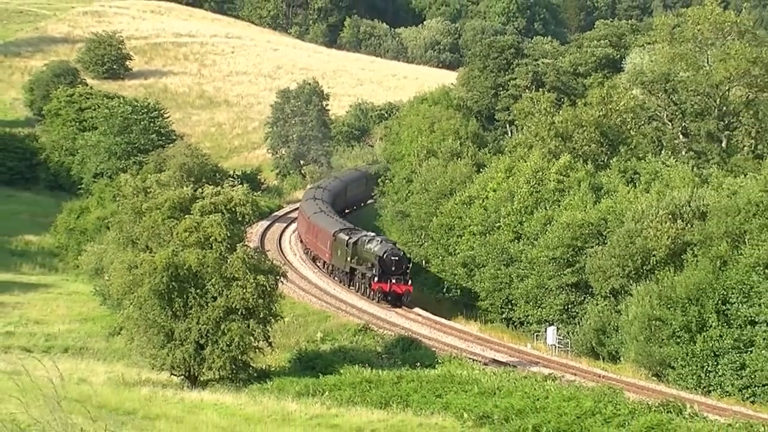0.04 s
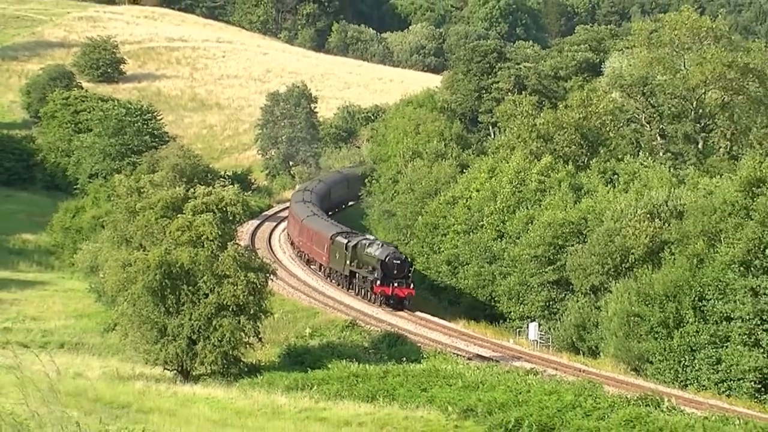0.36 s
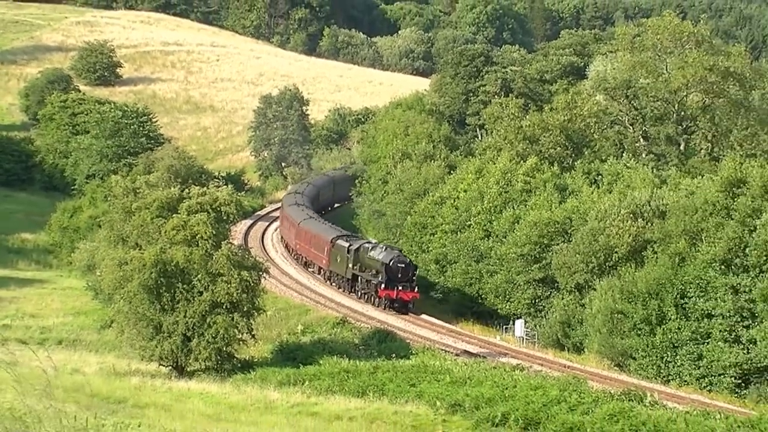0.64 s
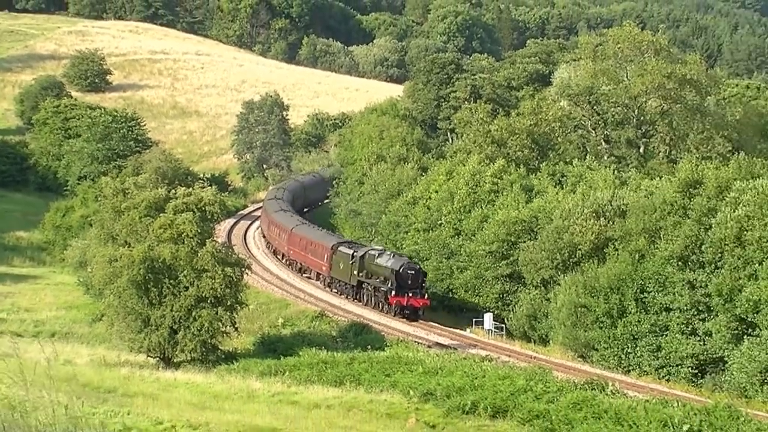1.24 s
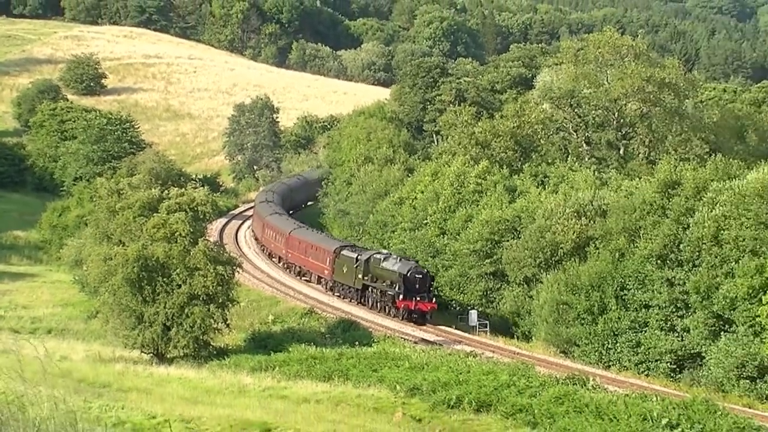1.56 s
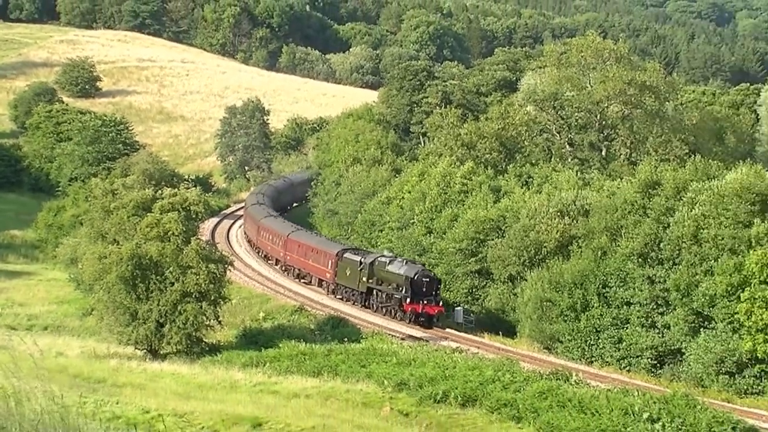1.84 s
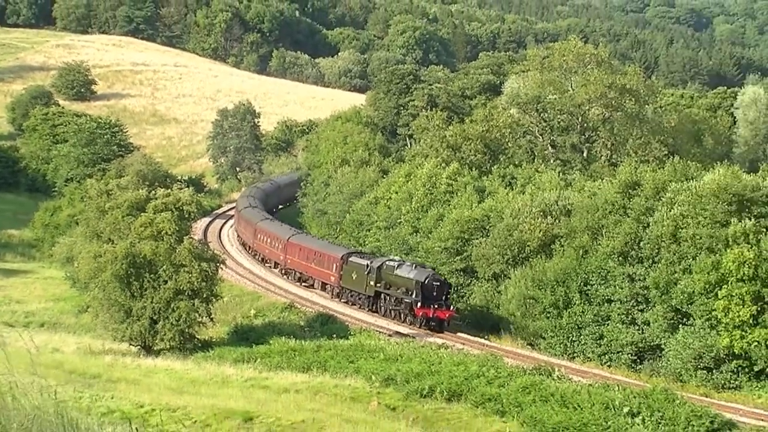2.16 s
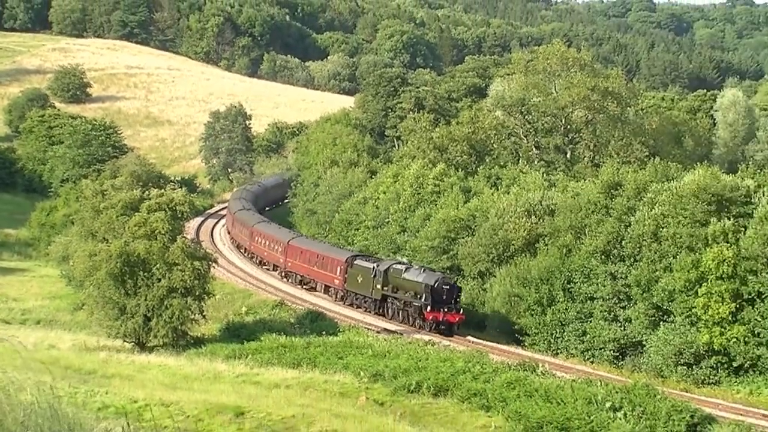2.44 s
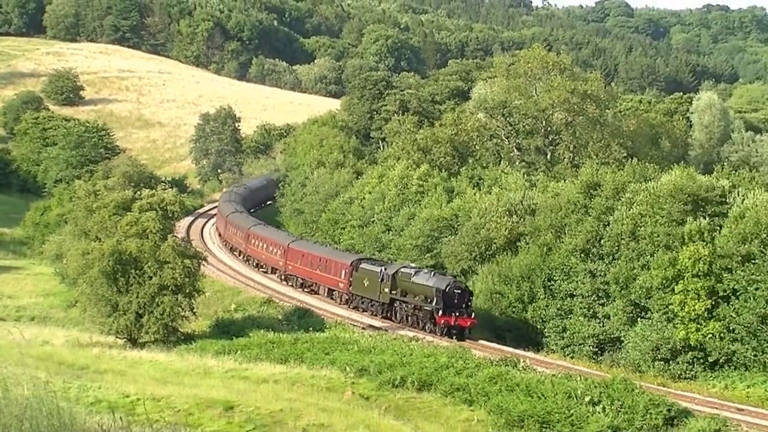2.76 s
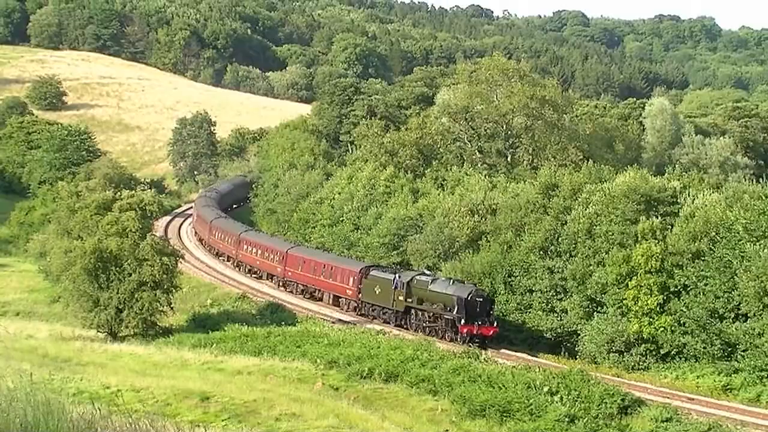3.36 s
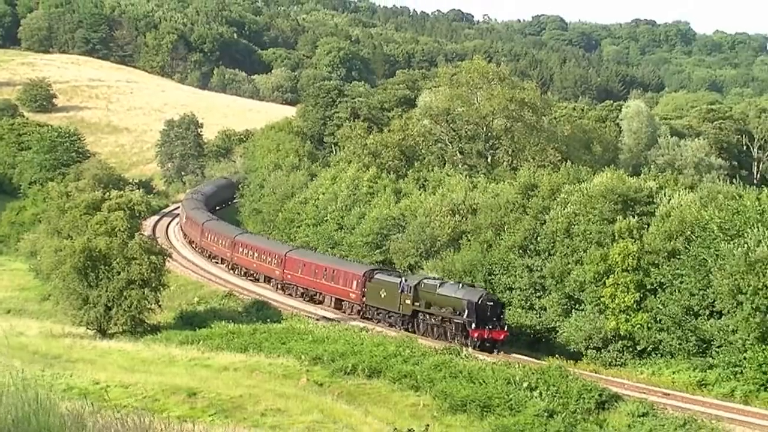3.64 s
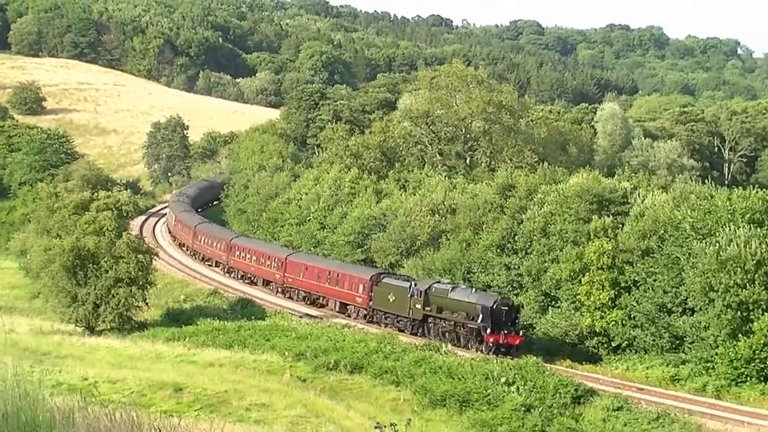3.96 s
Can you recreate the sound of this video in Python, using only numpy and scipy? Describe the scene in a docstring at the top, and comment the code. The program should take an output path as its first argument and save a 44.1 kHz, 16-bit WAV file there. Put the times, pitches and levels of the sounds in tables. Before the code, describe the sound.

Outdoors in a valley, a steam train some way from the microphone gives steady hissing chuffs, each with a faint echo. Beneath them run soft, uneven low puffs and the slowly swelling rumble of wheels on rails.

```python
"""A wooded valley, where a steam locomotive works some way off and slowly comes nearer.
Sharp chuffs come evenly, each a turbulent jet of steam gated by a valve, and the slopes scatter them
back as a diffuse echo. Soft low exhaust beats resonate unevenly in the chimney, about four to each chuff.
Underneath, the rolling noise of the coaches and a deep rumble grow as the distance shrinks."""
import sys
import numpy as np
from scipy import signal
from scipy.fft import rfft, irfft
from scipy.io import wavfile
from scipy.ndimage import uniform_filter1d

SR = 44100
rng = np.random.default_rng(int(sys.argv[2]) if len(sys.argv) > 2 else 0)


def wav_out(sig):
    """Save sig, one row per channel (or a flat mono array), as 16-bit PCM at SR to the path in sys.argv[1]."""
    wavfile.write(sys.argv[1], SR, np.round(np.clip(np.atleast_2d(sig).T, -1, 1) * 32767).astype(np.int16))


N = 176400
FRAME, HOP = 512, 128
HZ = np.fft.rfftfreq(FRAME, 1 / SR)
FRAME_TIMES = np.arange(N // HOP + 5)[:, None] * HOP / SR
APPROACH_DB_PER_S = 1.06


def amp(db):
    """Amplitude ratio of a level in decibels."""
    return 10 ** (np.asarray(db) / 20)


def unit(x):
    """Normalisation to rms 1."""
    return x / np.sqrt(np.mean(x ** 2) + 1e-20)


def read(points, hz):
    """Interpolation of a table on a log-frequency axis."""
    f, value = np.transpose(points)
    return np.interp(np.log(hz + 1), np.log(f + 1), value)


def hump(hz, octaves):
    """Gaussian peak on a log-frequency axis."""
    return np.exp(-.5 * (np.log2((HZ + 1) / hz) / octaves) ** 2)


def add(mix, start_s, sound):
    """Superposition of a sound on the mix."""
    part = mix[max(round(start_s * SR), 0):][:len(sound)]
    part += sound[:len(part)]


def colour(x, points):
    """Spectral filtering by a table of frequency_hz, gain_db."""
    return irfft(rfft(x) * amp(read(points, np.fft.rfftfreq(len(x), 1 / SR))), len(x))


def coloured_noise(spectrum):
    """Filtered white noise of rms 1."""
    return unit(colour(rng.standard_normal(N), spectrum))


def patches(frames, bins):
    """Random field of rms 1, correlated over time and frequency by smoothing."""
    field = rng.standard_normal((len(FRAME_TIMES), len(HZ)))
    for axis in (0, 1, 0, 1):
        field = uniform_filter1d(field, (frames, bins)[axis], axis, mode="wrap")
    return unit(field)


def shaped(x, gain):
    """Time-varying filter: a gain on each cell of the short-time spectrum."""
    spectra = signal.stft(x, nperseg=FRAME, noverlap=FRAME - HOP)[2]
    return signal.istft(spectra * gain[:spectra.shape[1]].T, nperseg=FRAME, noverlap=FRAME - HOP)[1][:N]


def rumble():
    """Spreading loss falls as the train nears, so its deep rumble swells."""
    # rumble spectrum: frequency_hz, density_db
    spectrum = [(15, -32), (40, -9), (62, 0), (85, -3), (130, -18), (400, -50), (2000, -90)]
    final_db, rise_db_per_s = -59, 1.5
    return amp(final_db + rise_db_per_s * (np.arange(N) - N) / SR) * coloured_noise(spectrum)


def wheels():
    """Rolling noise of wheels on rails, brightening as a shorter path lessens air absorption."""
    # rolling spectrum: frequency_hz, density_db
    spectrum = [(20, -44), (40, -38), (62, -18.5), (90, -20.5), (150, -2.5), (300, 1), (460, 2), (750, 0.5),
                (1100, -1.5), (1900, -1.5), (3500, -6), (4500, -16), (7000, -23), (10000, -31.5),
                (14000, -51)]
    growth_db_per_s = APPROACH_DB_PER_S + read([(4000, 0), (10000, 1)], HZ)
    level_db = -32 + growth_db_per_s * (FRAME_TIMES - FRAME_TIMES.mean())
    uneven_db = 1.5 * patches(frames=14, bins=4) + 0.55 * patches(frames=12, bins=120)
    return shaped(coloured_noise(spectrum), amp(level_db + uneven_db))


def running_gear():
    """Narrow-band noise from the running gear swells faintly for the first eighth of a second."""
    centre_hz, width_hz = 773, 344
    t, out = np.arange(SR // 8) / SR, np.zeros(N)
    band = np.exp(-.5 * ((np.fft.rfftfreq(len(t), 1 / SR) - centre_hz) / (width_hz / 2)) ** 2)
    ring = unit(irfft(rfft(rng.standard_normal(len(t))) * band, len(t)))
    swell = t / 4 * np.exp(1 + t / 4)
    add(out, 0, amp(-29) * ring * swell)
    return out


def chimney():
    """Resonance of the chimney gives a low boom to short exhaust puffs and to its steady draught."""
    # exhaust beats: start_s, relative_level_db
    beats = [(0.037, -16.5), (0.109, -22), (0.184, -21), (0.216, -17.5), (.300, -23.5), (0.423, -16.5),
             (.482, -19.5), (0.581, -16.5), (0.662, -22), (.720, -29), (0.785, -16.5), (0.823, -19.5),
             (.855, -21.5), (.928, -16.5), (0.964, -16), (1.044, -18.5), (1.156, -14.5), (1.329, -21),
             (1.414, -21.5), (1.482, -28), (1.554, -24.5), (1.675, -27), (1.790, -18), (1.914, -23),
             (2.044, -15), (2.158, -22), (2.285, -17), (2.415, -26), (2.452, -18), (2.540, -20),
             (2.651, -23.5), (2.704, -27), (2.826, -18.5), (2.905, -21.5), (3.026, -23), (3.078, -24),
             (3.154, -20), (3.198, -26), (3.274, -19), (3.365, -35), (3.461, -17.5), (3.582, -18),
             (3.656, -18.5), (3.778, -19), (3.860, -28), (3.913, -21), (3.948, -21.5)]
    # chimney spectrum: frequency_hz, density_db
    spectrum = [(20, -58), (40, -53), (65, -47), (95, -50.5), (130, -18), (190, -13), (245, 0.5), (300, 2),
                (370, -11.5), (550, -17.5), (900, -18.5), (1600, -34), (4000, -60)]
    rise_s, decay_s, beat_gain_db = 0.0066, 0.022, -8.5
    draught_db = -37 + APPROACH_DB_PER_S * (np.arange(N) - N / 2) / SR
    out = amp(draught_db) * coloured_noise(spectrum)
    t = np.arange(SR // 8) / SR
    envelope = np.minimum(t / rise_s, 1) * np.exp(-np.maximum(t - 2 * rise_s, 0) / decay_s)
    envelope_rms = np.sqrt(np.mean(envelope ** 2))
    for start_s, level_db in beats:
        puff = envelope_rms * unit(envelope * colour(rng.standard_normal(len(t)), spectrum))
        add(out, start_s, amp(level_db + beat_gain_db) * puff)
    return out


def valley(x):
    """Scattering by trees on the slopes: convolution with a noise tail gives a diffuse echo."""
    # envelope of the echo: delay_s, relative_level_db
    slopes = [(.012, 0.5), (.05, -1.5), (.09, -19), (.15, -3), (.21, -16.5), (0.301, -37), (.7, -22)]
    # frequency response of the echo: frequency_hz, gain_db
    response = [(300, -6), (2400, 1.5), (3600, 8.5), (4300, 10), (5200, 1.5), (6500, -3), (9000, -3.5),
                (14000, -6)]
    delay_s, level_db = np.transpose(slopes)
    t = np.arange(SR) / SR
    envelope = amp(np.interp(t, delay_s, level_db)) * (t > delay_s[0]) * (t < delay_s[-1])
    tail = rng.standard_normal(SR) * envelope
    return signal.fftconvolve(x, colour(tail / np.linalg.norm(tail), response))[:N]


def steam():
    """Turbulent jet noise gated by a valve that leaks, snaps open, holds and shuts; treble dies first."""
    # chuffs, with levels relative to the jet: start_s, open_s, level_db, treble_db, hiss_hz, hiss_db,
    # low_mid_db, ring_hz, ring_db, top_droop_db_per_s
    chuffs = [(0.061, 0.12, -5.5, -2.5, 8900, 3, 2.5, 2940, 6.5, 5),
              (0.436, 0.11, -0.5, -4, 6350, 5, 0, 2550, 1.5, 40),
              (.811, 0.11, -4, -0.5, 8300, 10.5, 8, 2710, 10.5, 14),
              (1.181, 0.1, 1.5, -9, 6800, 9.5, 0.5, 2970, 4, -1),
              (1.554, 0.12, -5, 5, 6110, 4, 13.5, 3500, 4, 57),
              (1.927, 0.12, -3.8, 6.5, 6350, 6, 10.5, 2800, 7.5, 65),
              (2.302, 0.1, 1.4, -2, 5900, 4, 2.5, 2180, 3.5, 1),
              (2.676, 0.11, -3, 4.6, 5550, 7.5, 6.5, 2930, 4, 20),
              (3.049, 0.12, -4, 7, 6000, -1, 5.5, 2800, 4, 65),
              (3.423, 0.12, -0.5, 7.5, 9450, 1.5, 0, 2750, 4, 113),
              (3.795, 0.13, -1.3, 0, 5400, 4.5, 2.5, 2750, 5, 99)]
    # jet spectrum: frequency_hz, density_db
    spectrum = [(300, -39), (1100, -19.5), (1600, -12), (2100, -3.5), (2700, -3), (3300, 0.5), (3650, -0.5),
                (4100, -9), (4800, -10.5), (6500, -10), (9500, -16), (11500, -23), (13500, -33),
                (15000, -43)]
    jet_db, attack_s, leak_rise_db_per_s = -21.5, .007, 414
    top = read([(2500, 0.065), (10000, 1)], HZ)  # blend from bass settings to top settings
    leak_db = -6 * (1 - top) - 15 * top
    release_db_per_s = 233 * (1 - top) + 463 * top
    treble = np.interp(HZ, (3680, 8900), (0, 1))
    low_mid = np.interp(HZ, (1390, 2900), (1, 0))
    power = 0
    for (start_s, open_s, level_db, treble_db, hiss_hz, hiss_db,
         low_mid_db, ring_hz, ring_db, top_droop_db_per_s) in chuffs:
        t = FRAME_TIMES - start_s
        opening_db = leak_db * (1 - np.clip(t / attack_s, 0, 1)) + leak_rise_db_per_s * np.minimum(t, 0)
        droop_db = (8 * (1 - top) + top_droop_db_per_s * top) * (np.clip(t, 0, open_s) - open_s / 2)
        closing_db = release_db_per_s * np.maximum(t - open_s + attack_s, 0)
        shelves_db = treble_db * treble + low_mid_db * low_mid
        peaks_db = hiss_db * hump(hiss_hz, octaves=0.26) + ring_db * hump(ring_hz, octaves=0.16)
        power += amp(level_db + opening_db - droop_db - closing_db + shelves_db + peaks_db) ** 2
    # turbulence in the jet and in the air on the way
    flutter_db = 0.6 * patches(frames=3, bins=200)
    mottle_db = 2 * patches(frames=7, bins=5) + 1.4 * patches(frames=24, bins=3)
    return shaped(amp(jet_db) * coloured_noise(spectrum), np.sqrt(power) * amp(flutter_db + mottle_db))


def scene():
    """Superposition of the steam, its echo and the lower sounds of the train, in mono."""
    jet = steam()
    echo = amp(-18) * valley(jet)
    return (jet + echo + wheels() + chimney() + rumble() + running_gear())[None]


def record(dry):
    """Band limiting by a linear-phase low-pass filter at 15 kHz."""
    low_pass = signal.firwin(511, 15000, window=("kaiser", 9), fs=SR)
    return signal.oaconvolve(dry, low_pass[None], "same")


dry = scene()
out = record(dry)
wav_out(out)
```